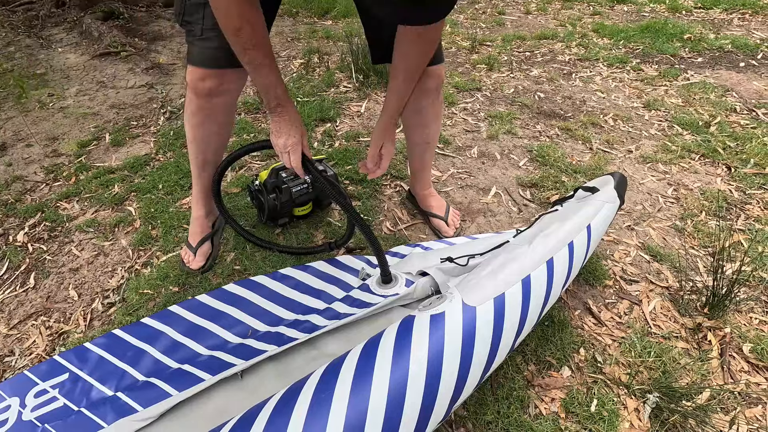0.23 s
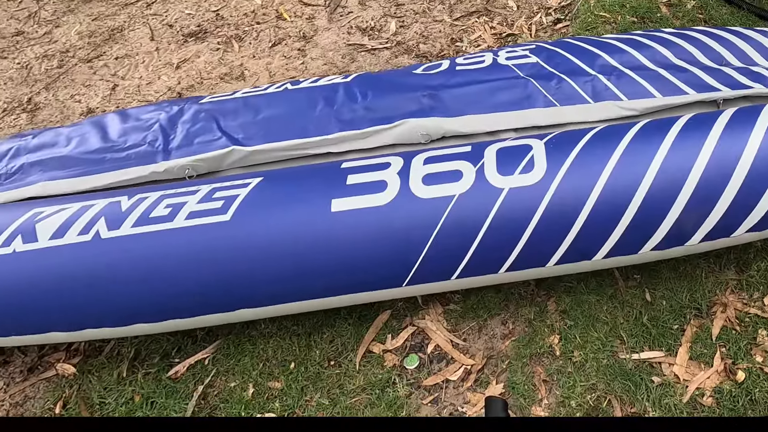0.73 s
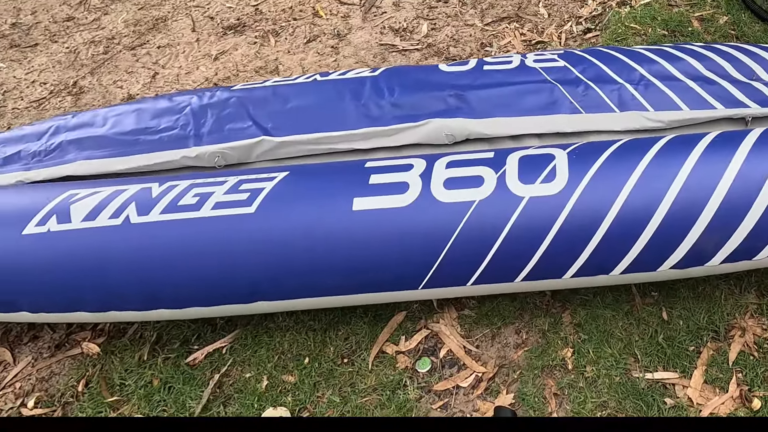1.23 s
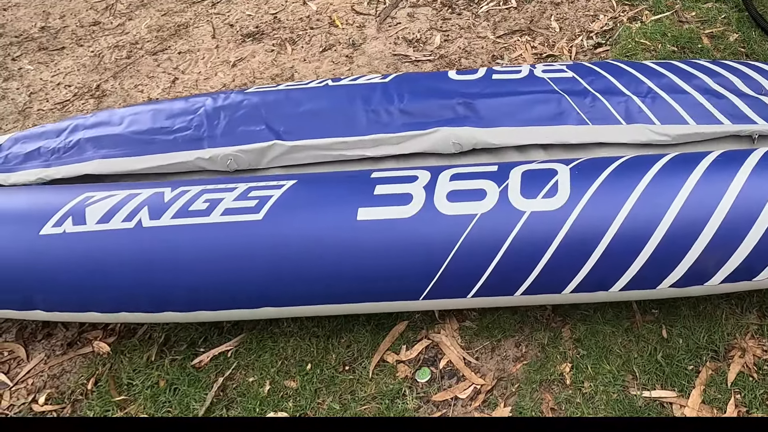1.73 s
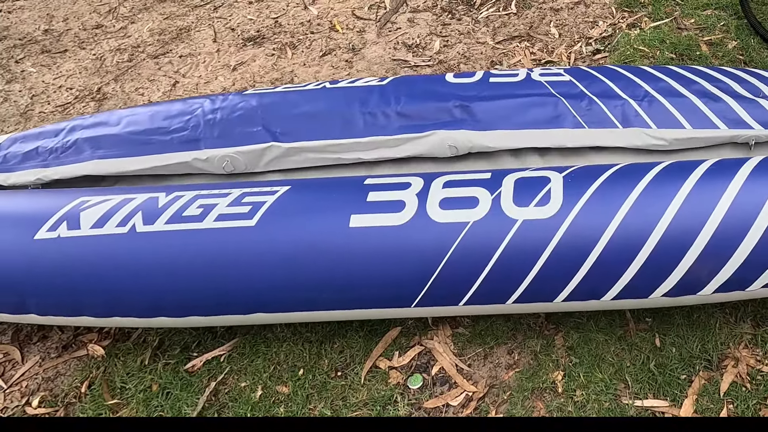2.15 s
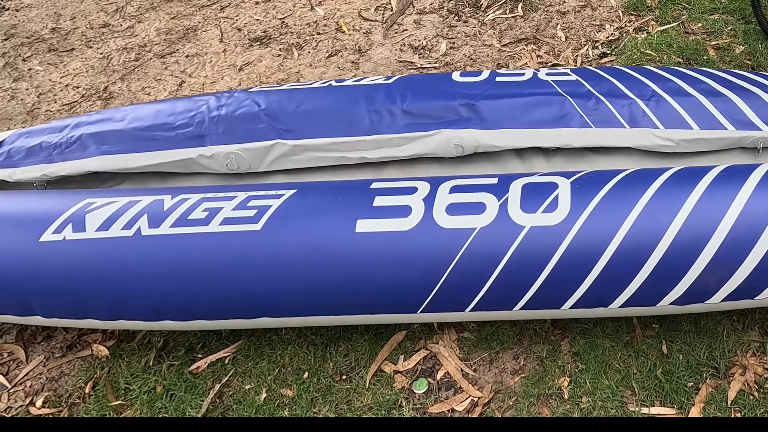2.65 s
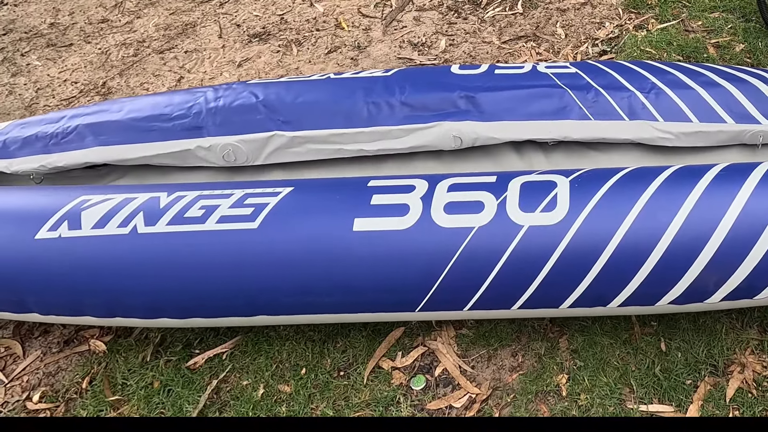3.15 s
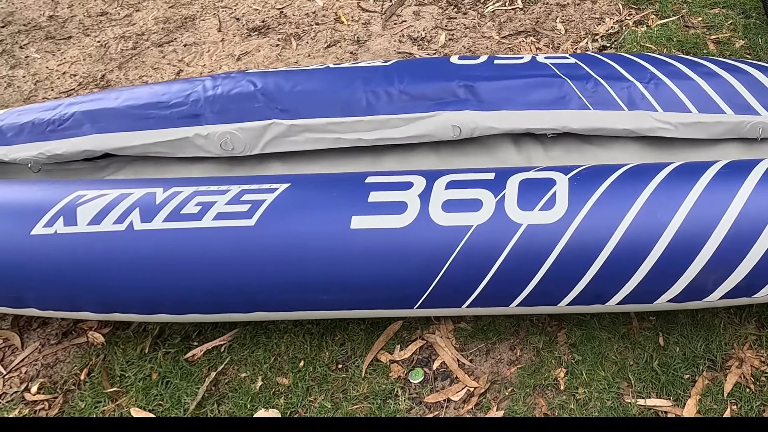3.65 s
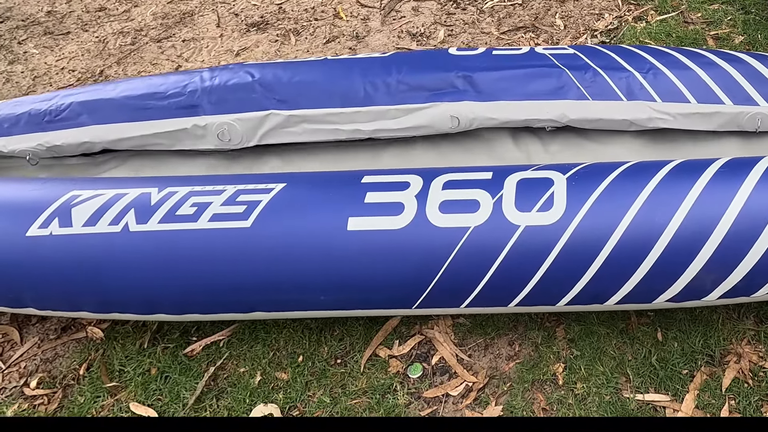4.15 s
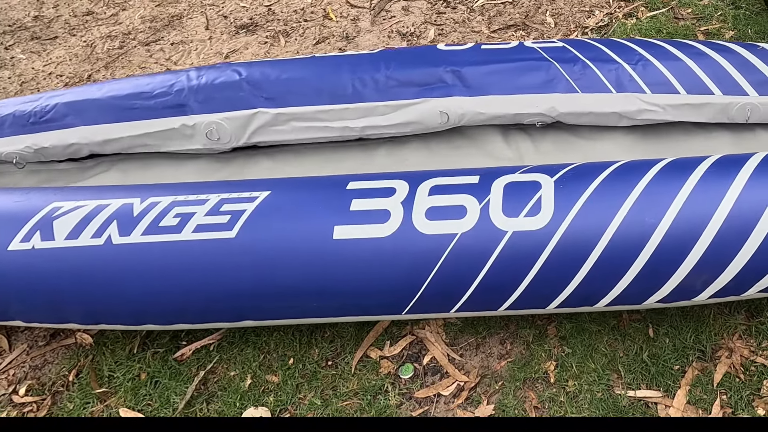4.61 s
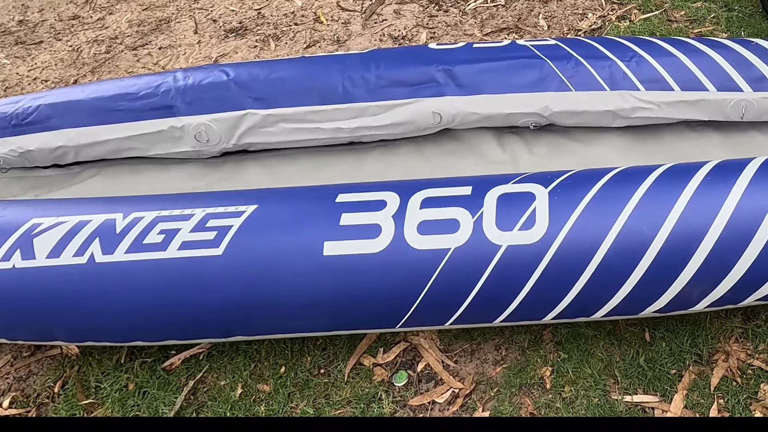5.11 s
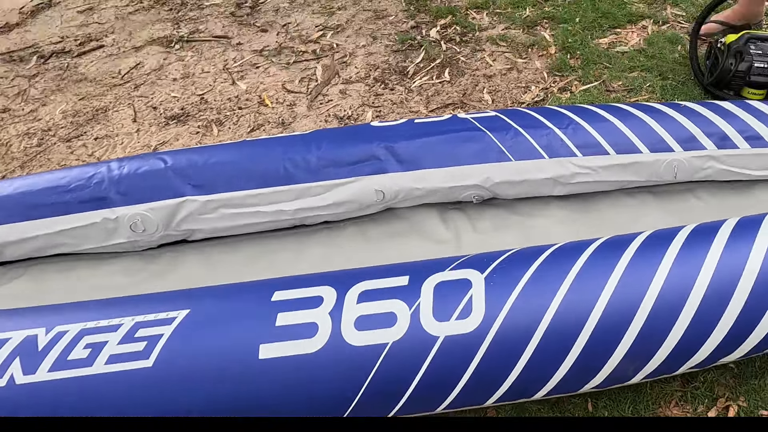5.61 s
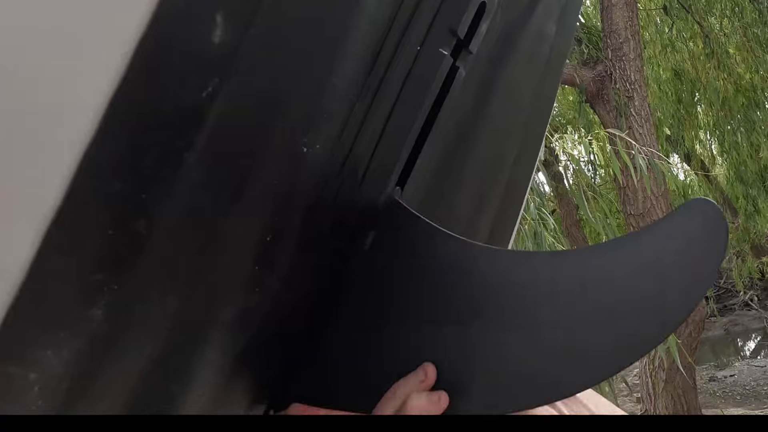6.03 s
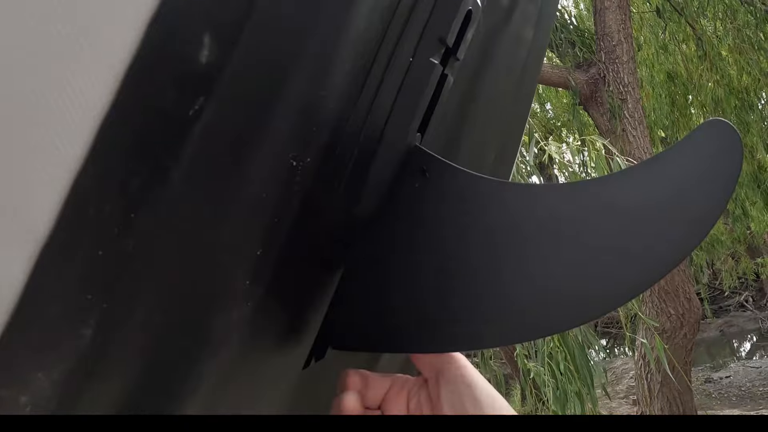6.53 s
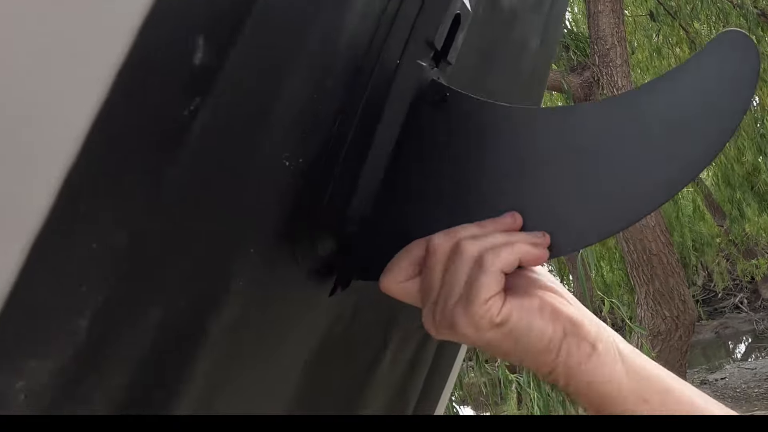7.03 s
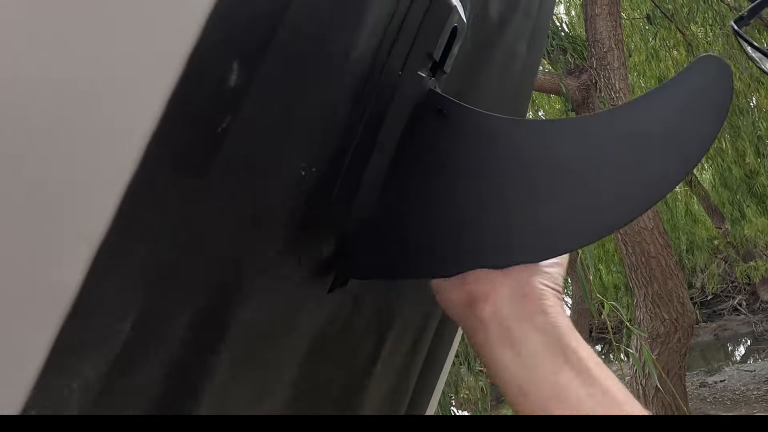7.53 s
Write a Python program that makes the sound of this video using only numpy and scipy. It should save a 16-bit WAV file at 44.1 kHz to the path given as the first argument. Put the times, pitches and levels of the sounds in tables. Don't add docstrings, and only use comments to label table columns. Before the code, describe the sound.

Outdoors, faint wind rumble and a tiny scrape drop into complete silence. An electric inflator then bursts in at full speed, a steady nasal whine with rushing air, for about five seconds. It cuts off instantly to a quiet close-up: a hard plastic fin being worked into a slot, with irregular sharp snaps, short scrapes and soft low hull thumps. The stereo microphone picks up light wind buffeting.

```python
import sys
import numpy as np
from scipy import signal
from scipy.fft import rfft, irfft, next_fast_len
from scipy.io import wavfile

SR = 44100
rng = np.random.default_rng(int(sys.argv[2]) if len(sys.argv) > 2 else 0)


def volts_from_db(level):
    exponent = np.asarray(level, float) / 20
    return 10 ** exponent


def to_wav(s):
    ch = np.atleast_2d(s).T
    pcm = np.round(np.clip(ch, -1, 1) * 32767)
    wavfile.write(sys.argv[1], SR, pcm.astype(np.int16))


N = 342585
TIME = np.arange(N) / SR
FREQ = np.maximum(np.arange(next_fast_len(N) // 2 + 1) * SR / next_fast_len(N), 1)
SILENCE_S = (.2585, .6753)
PUMP_S = (.6, 5.6956)


def rms_one(x):
    return x / np.sqrt(np.mean(x ** 2) + 1e-20)


def in_time(table):
    s, *columns = np.transpose(table)
    return [np.interp(TIME, s, c) for c in columns]


def at_hz(points, hz):
    known, *columns = np.transpose(points)
    return [np.interp(np.log(hz), np.log(known), c) for c in columns]


def resonances(table, order):
    return sum(db / (1 + (2 * (FREQ - hz) / width) ** order) for hz, width, db in table)


def drift(rate):
    r = np.exp(-80 * np.pi * rate / SR)
    slow = signal.lfilter([1], [1, -2 * r, r * r], rng.standard_normal(N // 40 + 2002))[2000:]
    return np.interp(np.arange(N) / 40, np.arange(len(slow)), rms_one(slow))


def ports(x, table, colour_db=0):
    size = next_fast_len(N)
    pan_db, alike, lead = at_hz(table, FREQ)
    alike = np.clip(alike, 0, 1)
    common, alone = rfft(x, size) * volts_from_db(colour_db)
    side = np.array([[.5], [-.5]])
    both = np.sqrt(1 + alike) * common + np.sqrt(1 - alike) * alone * 2 * side
    return irfft(both * volts_from_db(pan_db * side) * np.exp(1j * lead * side), size)[:, :N]


def noise(colour_db, table, grain=1):
    return rms_one(ports(rng.standard_normal((2, N)) * grain, table, colour_db))


def ring(clicks, hz, t60):
    r, w = volts_from_db(-60 / (t60 * SR)), 2 * np.pi * hz / SR
    return signal.lfilter([0, np.sin(w)], [1, -2 * r * np.cos(w), r * r], clicks + 1e-18)


def tone(spin, level_db, pan_db, lead):
    side = np.array([[.5], [-.5]])
    port = np.sqrt(2) * volts_from_db(pan_db * side) * np.exp(1j * lead * side)
    spin = spin * volts_from_db(level_db)
    return port.real * spin.imag + port.imag * spin.real


def swells(rows, softness=0.44):
    out = np.zeros((len(rows[0]) - 2, N))
    for s, length, *levels_db in rows:
        start = int(s * SR)
        t = TIME[start:int((s + length) * SR)]
        shape = np.abs(np.sin(np.pi * (t - s) / length)) ** softness
        out[:, start:start + len(t)] += np.outer(volts_from_db(levels_db), shape)
    return out


# frequency in Hz, left-right level in dB, likeness from 0 to 1,
# left lead in radians.
PORTS_PUMP = [(100, -4.5, .93, .2), (250, -4.5, .8, .3), (500, -.3, .98, 0), (1000, -2.2, .95, -.3),
              (3200, -4.2, .92, -.85), (6000, -3.7, .87, -.4), (8500, -3.3, .6, .3), (11000, 1, .55, .4),
              (13000, 1.5, .6, .6)]
# frequency in Hz, level in dB.
RUMBLE = [(12, 0), (30, 5), (65, 2.5), (100, -7.5), (200, -35), (2000, -120)]
# frequency in Hz, level in dB.
FLUTTER = [(60, -12), (95, 2), (160, -5), (280, -14.5), (500, -25), (5000, -110)]
# start in seconds, length in seconds, rumble in dB, flutter in dB.
GUSTS = [(0, 0.093, -25.5, -64), (.8, 0.34, -41, -45.5), (1.4, 0.69, -36, -70), (1.7, 0.63, -26, -37.5),
         (2.12, 0.48, -26, -47), (2.75, 0.26, -28, -49), (4.05, 0.62, -67, -47), (4.68, 0.25, -26, -56),
         (4.86, 0.24, -36, -51), (5.68, 0.31, -36, -43.5), (5.97, 0.68, -33, -43), (6.45, 0.45, -38, -50),
         (6.75, 0.44, -29, -40.5), (7.45, 0.21, -42, -70)]
# start in seconds, length
# in seconds, level in dB.
LOW_BURSTS = [(1.73, 0.025, -44), (1.815, 0.03, -46), (1.87, 0.056, -37), (1.95, 0.037, -12.5),
              (1.985, .035, -23), (2.1, 0.041, -27), (2.255, 0.03, -27), (2.315, 0.025, -27),
              (2.15, 0.023, -39), (2.4, 0.027, -31), (2.48, 0.032, -25), (2.63, 0.045, -38),
              (2.88, 0.047, -35), (4.77, 0.03, -31), (4.855, 0.028, -31), (4.92, 0.026, -36),
              (5.25, 0.021, -31), (6.03, 0.051, -29.5), (6.16, 0.064, -27.5), (6.32, 0.08, -42),
              (6.575, 0.036, -27.5), (6.91, 0.11, -31), (7.49, 0.085, -55)]
CALM_DB, CALM_FLUTTER_DB = -42.5, -62


def wind():
    rumble, flutter = swells(GUSTS, 0.73)
    low = noise(at_hz(RUMBLE, FREQ)[0], PORTS_PUMP) * (rumble + volts_from_db(CALM_DB)) * volts_from_db(1.4 * drift(37))
    flutter = (flutter + volts_from_db(CALM_FLUTTER_DB)) * volts_from_db(4.4 * drift(27))
    flutter = flutter + swells(LOW_BURSTS, 0.65)[0]
    high = noise(at_hz(FLUTTER, FREQ)[0], PORTS_PUMP) * flutter
    away = (TIME < PUMP_S[0]) | (TIME > PUMP_S[1])
    turned_db = 1.8 * np.array([[1], [-1]]) * away
    return (low + high) * volts_from_db(turned_db)


# frequency in Hz, left-right level in dB, likeness from 0 to 1,
# left lead in radians.
PORTS_FIN = [(60, 2, 1, 0), (400, -0.7, 0.96, -0.16), (1400, -0.7, 1, -0.39), (3100, .1, 0.79, -0.64),
             (7140, 1, 1, -0.53), (12000, 2.2, 0.4, -0.24)]
# time in seconds, level in dB.
RUB = [(0, -47.5), (.12, -47), (5.7, -62), (5.785, -56), (5.83, -45), (6.3, -46.5), (6.8, -49),
       (7.26, -42.5), (7.29, -52.5), (7.42, -48), (7.77, -49.5)]
# frequency in Hz, level in dB.
RUB_LOW = [(200, 9.5), (400, -7), (700, -13), (1100, -3.5), (2000, -6), (3000, -32), (16000, -89)]
# frequency in Hz, level in dB.
RUB_HIGH = [(1500, -19), (2600, 4), (3500, -0.5), (7500, -7), (8500, -12), (12000, -19), (16000, -57)]
RUB_TREBLE_DB = -9.5


def rubbing():
    pressure_db = in_time(RUB)[0] + 1.8 * drift(25) * (TIME > PUMP_S[1])
    low = noise(at_hz(RUB_LOW, FREQ)[0], PORTS_FIN) * volts_from_db(pressure_db)
    high = noise(at_hz(RUB_HIGH, FREQ)[0], PORTS_FIN) * volts_from_db(pressure_db + RUB_TREBLE_DB)
    return (low + high) * ((TIME < SILENCE_S[0]) | (TIME > PUMP_S[1]))


# start in seconds, length in seconds, dull, bright and airy level in dB.
SLIDES = [(.11, 0.071, -47, -49, -61), (.174, 0.007, -66, -53, -49), (5.62, 0.17, -45, -43, -56),
          (5.863, 0.11, -36, -33.5, -43), (5.89, 0.065, -56, -64, -45), (5.995, 0.054, -33.5, -33, -47),
          (6.05, 0.037, -49, -46, -61), (6.14, 0.055, -27, -32, -44), (6.166, 0.049, -24, -21.5, -35),
          (6.35, 0.088, -51, -51, -56), (6.425, 0.03, -44, -40.5, -48.5), (6.49, 0.014, -55, -44, -54),
          (6.595, 0.061, -39.5, -41.5, -51), (6.67, 0.082, -43.5, -47.5, -65),
          (6.77, 0.028, -41.5, -50, -61), (6.872, 0.02, -34, -37, -38), (6.901, 0.054, -18.5, -21.5, -35),
          (6.918, 0.028, -30.5, -24, -26.5), (6.95, 0.039, -35, -49, -72), (7.13, 0.074, -45, -47, -64),
          (7.22, 0.087, -52, -50, -65), (7.478, 0.022, -33, -37, -45.5), (7.49, 0.041, -30, -44, -57),
          (7.525, 0.058, -41.5, -43, -59), (7.575, 0.041, -36, -42, -54), (7.66, 0.05, -35.5, -40, -53),
          (7.733, 0.024, -40.5, -39, -46.5)]
# frequency in Hz, level in dB.
SLIDE_BODY = [(150, 12), (320, 5), (450, -7.5), (660, 3.5), (1800, -0.5), (2700, 7.5), (3400, 0),
              (4700, 0.5), (8200, -6), (10500, -12.5), (16000, -34)]
# centre in Hz, width in Hz, height in dB.
SLIDE_PEAKS = [(567, 160, 5.5), (1400, 300, 5), (3350, 550, 8), (4640, 600, 4.0), (7200, 1200, 3.5)]
JUDDER_S, JUDDER_LENGTH_S, JUDDER_HZ, JUDDER_DB, JUDDER_CHOP = 6.9205, .027, 312, -18.5, .6


def slides():
    judder = np.cos(2 * np.pi * JUDDER_HZ * (TIME - JUDDER_S - .0047))
    judder = judder * swells([(JUDDER_S, JUDDER_LENGTH_S, 0)], .4)[0]
    colour_db = at_hz(SLIDE_BODY, FREQ)[0] + resonances(SLIDE_PEAKS, 2)
    grain = volts_from_db(1.4 * drift(140) + 3.8 * drift(700)) * (1 - JUDDER_CHOP * judder)
    rough = noise(colour_db, PORTS_FIN, grain)

    def part(hz, kind):
        return rms_one(signal.sosfilt(signal.butter(2, hz, kind, fs=SR, output="sos"), rough))

    dull, bright, airy = part(2300, "low"), part([2600, 6800], "band"), part([8800, 14000], "band")
    low, middle, high = swells(SLIDES, 0.68)
    return low * dull + middle * bright + high * airy + volts_from_db(JUDDER_DB) * judder


# time in seconds, turns per second, unbalance tone in dB.
ROTOR = [
    (0.675, 357.85, -12.3),
    (1, 357.97, -12.95),
    (2.5, 358.17, -12.7),
    (3.3, 358.1, -12.9),
    (3.7, 358.57, -13.1),
    (4.1, 358.57, -12.8),
    (4.9, 358.17, -13.2),
    (5.2, 358.3, -13.4),
    (5.696, 358.2, -14),
]
# rms level in dB, left-right level in dB.
ORDER_TONES = [(-12.9, -1.4), (-44.4, -2.4), (-32.9, -4.8), (-48.7, -2.9), (-39.2, -4.7), (-44.7, -3.6),
               (-31.1, -3.0), (-27, -8.8), (-43.5, -2.7), (-42.8, -4.7), (-57.3, -2.7), (-49.7, -2.3),
               (-57.5, -4.1), (-56.7, -4.1), (-46.5, -3.9), (-32.4, -4.6), (-50.0, -5.8), (-51.3, -5.1),
               (-53.9, -4.5), (-51.1, -2.9), (-53.5, -3.7), (-59.7, -3.0), (-67.4, -5.9), (-48.4, -6.3),
               (-57.8, -2.7), (-53.9, -5.9)]
TOP_TONES = [-61, -62.5, -61, -63.5, -68, -69, -66, -68, -74, -77, -74, -73, -76, -75, -73, -77]
STEADY_ORDERS = (3, 8, 16, 24)
# multiple, centre in seconds,
# half length in seconds, change in dB.
ECHO_SWINGS = [(3, 0.82, 0.09, -14), (3, 4.93, 0.55, -3), (8, .68, 0.33, -2.5), (8, 1.26, 0.25, 2.5),
               (8, 4.2, 0.22, -2.5), (8, 5, 0.77, -2.5), (16, 1.16, 0.083, -4.5), (16, 1.05, 0.038, -18),
               (16, 4.81, 0.53, -7.5), (24, 1.03, 0.059, -10), (24, 4.55, 0.29, -2), (24, 11, 0.31, 3),
               (24, 7.3, .3, 1)]
DRIVE_HZ = 1702.3
# time in seconds, level in dB.
DRIVE = [
    (.675, -25.5),
    (.87, -28),
    (1.1, -23.5),
    (2.7, -26),
    (3.6, -30.5),
    (4.1, -44.5),
    (4.55, -33.5),
    (4.9, -34),
    (5.696, -22),
]
# drive multiple, rotor multiple, rms level in dB.
MIXED_TONES = [
    (1, 1, -45),
    (1, -1, -54),
    (2, 0, -48),
    (3, -3, -49),
    (1, 8, -52),
]
# frequency in Hz, density in dB per Hz.
AIR = [(120, -11), (300, -10), (360, -53), (430, -16), (520, -9), (800, -11), (1300, -8.5), (2800, -7.5),
       (4500, -9), (4800, -12), (7800, -17), (8100, -24), (10800, -30.5), (12200, -32), (15500, -43)]
# centre in Hz, width in Hz, height in dB.
HOUSING = [(1043, 250, 5.7), (1485, 160, 6.3), (1910, 33, 0.69), (2432, 124, 4.3), (2987, 204, 9.7),
           (3370, 540, 2.7), (3920, 120, 4.6), (5460, 750, 4.5), (7700, 87, 1.6), (9800, 1100, 1.9)]
# centre in Hz, width in Hz, height in dB.
BEARING = [(874, 27, 7), (922, 9.3, 12.5), (1238, 17, 5.5), (1590, 17, 9), (1730, 7.9, -8), (1676, 14, -17),
           (2007, 11.6, 12)]
# centre in Hz, width in Hz, change in dB.
TAUT = [(4300, 370, 5), (6150, 1300, -3), (3970, 280, -3), (2020, 240, -0.5), (1210, 2300, -2.5),
        (9450, 1400, 5.5)]
# time in seconds, share from 0 to 1.
FILLED = [
    (.68, 0.43),
    (1.2, 0.069),
    (3.2, 0.092),
    (4.4, 0.63),
    (5.69, 0.81),
]
# time in seconds, level in dB.
AIR_LEVEL = [
    (0.68, -38.5),
    (0.73, -40),
    (5.69, -40.5),
]


def pump():
    speed, unbalance_db = in_time(ROTOR)
    turn = 2 * np.pi * np.cumsum(speed + 0.095 * drift(6.7)) / SR
    turn += 2.1 - turn[round(SILENCE_S[1] * SR)]
    drive = 2 * np.pi * DRIVE_HZ * TIME
    followed = {k: ORDER_TONES[k - 1][0] + 0.11 * drift(20.0) for k in STEADY_ORDERS}
    followed[1] = unbalance_db + .25 * drift(9)
    for k, s, half, swing_db in ECHO_SWINGS:
        followed[round(k)] = followed[round(k)] + swing_db * np.exp(-((TIME - s) / half) ** 2)
    out = tone(np.exp(1j * drive), in_time(DRIVE)[0] + .4 * drift(12), -1.5, -.86)

    wander = np.array([drift(1.2), drift(.7), drift(2.2)])
    step, spin = np.exp(1j * turn), 1
    top = [(level_db, .5) for level_db in TOP_TONES]
    for k, (level_db, pan_db) in enumerate(list(ORDER_TONES) + top, 1):
        wander_db = (.35 + .02 * k) * (rng.normal(0, 1, 3) @ wander)
        lead = at_hz(PORTS_PUMP, k * ROTOR[0][1])[2]
        spin = spin * step * np.exp(2j * np.pi * (k > 1) * rng.random())
        out += tone(spin, followed.get(k, level_db + wander_db), pan_db, lead)
    for m, k, level_db in MIXED_TONES:
        out += tone(np.exp(1j * (round(m) * drive + round(k) * turn)), level_db, -2.0, -0.67)

    colour_db = at_hz(AIR, FREQ)[0] + resonances(HOUSING, 4) + resonances(BEARING, 4)
    chop = 1 + 0.15 * np.sin(turn)
    filled = np.clip(in_time(FILLED)[0], 0, 1)
    slack_air = np.sqrt(1 - filled) * noise(colour_db, PORTS_PUMP, chop)
    taut_air = np.sqrt(filled) * noise(colour_db + resonances(TAUT, 4), PORTS_PUMP, chop)
    out += (slack_air + taut_air) * volts_from_db(in_time(AIR_LEVEL)[0] + 12.5 + .5 * drift(17))
    return out * (TIME > PUMP_S[0]) * (TIME < PUMP_S[1])


HUM_HZ, HUM_DB = 158, -54


def hum():
    far = volts_from_db(HUM_DB + 4.1 * drift(3.0)) * np.sin(2 * np.pi * HUM_HZ * TIME)
    return far * (TIME > PUMP_S[1]) * volts_from_db([[-.5], [.6]])


# time in seconds, peak in dB, pulse centre in Hz, sharp edge in dB, ringing in dB.
SNAPS = [(5.8066, -9, 1530, -5.5, -18), (5.9422, -11, 1730, -8, -12), (6.033, -16.5, 905, -9, -2.5),
         (6.1204, -14.5, 1490, -14, 1), (6.186, -18, 1080, -21, 4), (6.3133, -5.5, 1990, -26, -1.5),
         (6.3712, -12.5, 1600, -16, -13), (6.4661, -2.5, 2360, -22, -2.5), (6.5442, -10.5, 1830, -6, -10),
         (6.659, -6, 1860, 0.5, -2), (6.6666, -1.5, 1910, -8.5, -11), (6.87, -7, 1590, -6.5, -13.5),
         (6.8999, -8.5, 1560, -4.5, -10), (6.9113, -9, 1600, -14, -3), (6.9193, -19, 2150, 0, -3),
         (6.9252, -13, 1540, 1, -12), (7.0432, -15, 1940, -7.5, -4.5), (7.2009, 1, 2300, -23, -1.5),
         (7.217, -5, 1690, -5.5, -10), (7.4127, -12, 1800, -1, -8), (7.445, -12.5, 2120, -12, 0),
         (7.4507, -12.5, 1980, -7, -1), (7.4576, -13.5, 2020, -26, -1.5), (7.4954, -17, 1960, -20, 3.5),
         (7.571, -1, 2270, -24.5, -5), (7.6228, -14, 2060, -24, 6.5), (7.6753, -16, 1930, -8, 4),
         (7.6789, -14, 2080, -17, -1), (7.7031, -14.5, 2040, -4.5, -0.5)]
# time in seconds, peak in dB.
TICKS = [(5.816, -21), (6.0289, -17.5), (6.1415, -15), (6.1526, -24), (6.164, -24), (6.214, -17),
         (6.4263, -24), (6.499, -31.5), (6.8958, -21), (6.303, -41), (6.17, -27), (6.1786, -26),
         (6.308, -39), (7.0197, -29.5), (7.1596, -34), (7.1897, -28), (7.515, -25), (6.0185, -38),
         (6.1955, -23), (6.932, -35), (6.9358, -13), (7.701, -20.5), (7.729, -23)]
# frequency in Hz, level in dB, t60 in seconds.
FIN = [(565, -19.5, .03), (974, -14, 0.014), (1560, -27, 0.012), (1820, -18, 0.0061), (2370, -16, 0.015),
       (2840, -11, 0.0042), (3250, -7.5, 0.0089), (4550, -20, .009), (5450, -12.5, .008), (7400, -31, .006)]
# frequency in Hz, level in dB.
SNAP_COLOUR = [(300, -14.5), (480, 2.5), (850, 1), (1000, 2.5), (3300, -5), (7500, -14), (8300, -27),
               (10000, -19.5), (13000, -27), (16000, -42)]
TICK_HZ, TICK_RISE_HZ_PER_S, TICK_EDGE_DB = 1490, 150, -20
EDGE_SPREAD_DB = 6.5
GROUND_ECHO_S, GROUND_ECHO_DB = .0084, -27


def snaps():
    out, t = np.zeros(N + 2000), np.arange(-60, 1940) / SR
    ticks = [(s, db, TICK_HZ + TICK_RISE_HZ_PER_S * (s - 6), TICK_EDGE_DB, -4.0) for s, db in TICKS]
    slips = list(SNAPS) + ticks
    sides = -(-1.) ** np.arange(len(FIN))
    chance = rng.standard_normal((len(slips), len(FIN), 2))
    fade_db = -30 - 3.6 * np.arange(400) / SR * 1000
    scatter = rng.standard_normal((len(slips), 400)) * volts_from_db(fade_db)
    for (s, peak_db, hz, edge_db, ring_db), luck, echoes in zip(slips, chance, scatter):
        u, v = (np.pi * hz * .95 * t) ** 2, (np.pi * 5600 * t) ** 2
        body = -(1 - 2 * u) * np.exp(-u)
        edge = -volts_from_db(edge_db + 16.0) * (1 - 2 * v) * np.exp(-v)
        modes = 0
        for (f, db, t60), (a, b), side in zip(FIN, luck, sides):
            gain = side * volts_from_db(db + ring_db - 13 + 2.5 * a)
            modes = modes + gain * ring(body + edge, f * (1 + .028 * b), t60)
        scattered = np.convolve(body + volts_from_db(EDGE_SPREAD_DB) * edge, echoes)[:2000]
        hit = body + edge + np.roll(scattered - modes, 5)
        ground = volts_from_db(GROUND_ECHO_DB) * np.roll(hit, round(GROUND_ECHO_S * SR))
        i = round(s * SR) - 60
        out[i:i + 2000] += volts_from_db(peak_db) * (hit + ground)
    late = signal.lfilter([.3], [1, -.7], np.roll(out[:N], 37))
    return ports(np.array([out[:N], .5 * late]), PORTS_FIN, at_hz(SNAP_COLOUR, FREQ)[0] - 1.5)


# time in seconds, frequency in Hz, level in dB.
SQUEAK = [
    (5.86, 340, -64),
    (5.885, 402, -58),
    (5.92, 447, -37),
    (5.945, 395, -42),
    (5.97, 300, -38),
]


def squeak():
    hz, level_db = in_time(SQUEAK)
    sounding = (TIME > SQUEAK[0][0]) & (TIME < SQUEAK[-1][0])
    glide = np.sin(2 * np.pi * np.cumsum(hz) / SR)
    return sounding * volts_from_db(level_db + 2.3 * drift(40)) * glide * volts_from_db([[-.5], [.6]])


# time in seconds, peak in dB, frequency in Hz (negative when it springs
# outward first), t60 in seconds.
THUMPS = [(6.036, -21, 38, 0.3), (6.062, -21, 45, .09), (6.149, -19, 92, 0.042), (6.165, -18, 70, .06),
          (6.184, -12, 55, .05), (6.194, -15, -46, 0.16), (6.317, -23, -50, 0.4), (6.337, -19, -50, .06),
          (6.586, -14, 62, 0.06), (6.606, -22, -52, .3), (6.64, -22, 36, .15), (6.874, -21, -50, .05),
          (6.8995, -13, -26, 0.08), (6.941, -9, 45, 0.05), (6.9515, -2, -29, 0.07), (6.969, -18, 17, .6),
          (7.49, -22, 22, .15), (7.511, -9, -37, 0.06), (7.532, -18, 26, .12)]


def thumps():
    out = np.zeros(N)
    for s, peak_db, hz, t60 in THUMPS:
        i = round(s * SR)
        t = TIME[i:i + SR // 2] - TIME[i]
        onset = 1 - np.exp(-t * abs(hz) * 37.0)
        out[i:i + SR // 2] -= volts_from_db(peak_db + 4.0 - 60 * t / t60) * onset * np.sin(2 * np.pi * hz * t)
    return out * volts_from_db([[-.5], [.6]])


# start in seconds, length in seconds, first Hz, last Hz, level in dB.
CHIRPS = [
    (6.795, 0.075, 2780, 2680, -58),
    (7.292, 0.028, 3700, 3030, -63),
]


def birds():
    out = np.zeros(N)
    for s, length, start_hz, end_hz, level_db in CHIRPS:
        i, part = round(s * SR), np.arange(0, 1, 1 / (length * SR))
        phase = 2 * np.pi * np.cumsum(start_hz + (end_hz - start_hz) * part) / SR
        level = volts_from_db(level_db + 4.0 * drift(150)[:len(part)])
        out[i:i + len(part)] += level * np.sin(np.pi * part) * np.sin(phase)
    return out


def scene():
    return wind() + rubbing() + slides() + pump() + hum() + snaps() + squeak() + thumps() + birds()


def low_pass(x):
    return signal.sosfilt(signal.butter(12, 16850, fs=SR, output="sos"), x)


def record(dry):
    lowpass = signal.cheby2(10, 70, 16300, fs=SR, output="sos")
    dulled = signal.sosfilt(lowpass, np.clip(dry, -1, 1))
    fade_out, cut_in = (SILENCE_S[0] - TIME) * 600, (TIME - SILENCE_S[1]) * SR
    gap = np.clip(np.maximum(fade_out, cut_in), 0, 1)
    return low_pass(dulled * gap)


dry = scene()
out = record(dry)
to_wav(out)
```